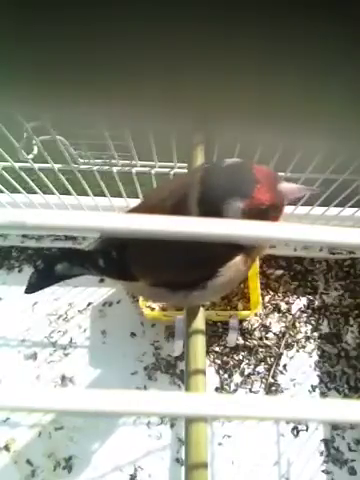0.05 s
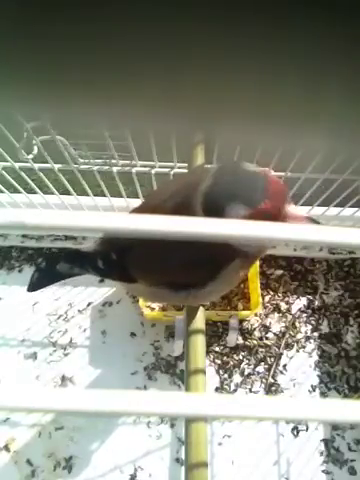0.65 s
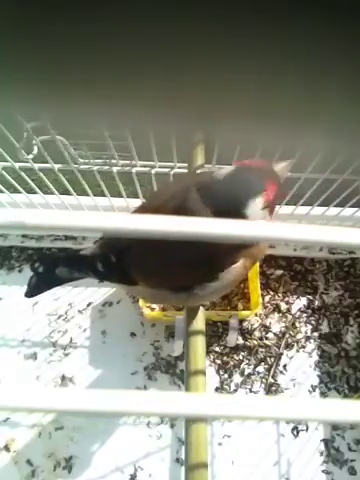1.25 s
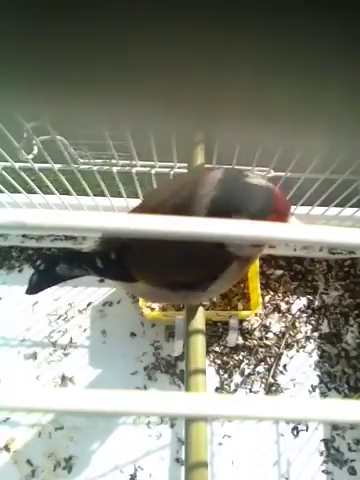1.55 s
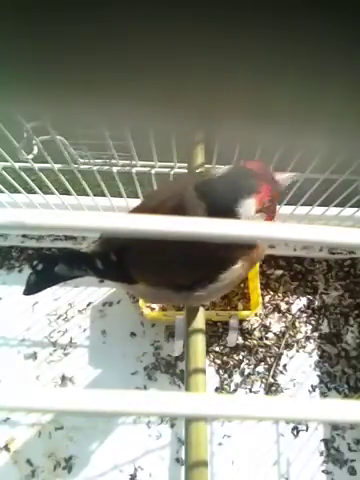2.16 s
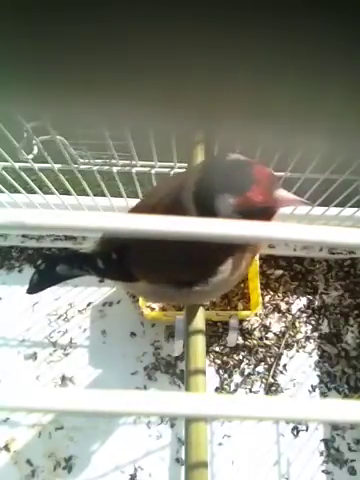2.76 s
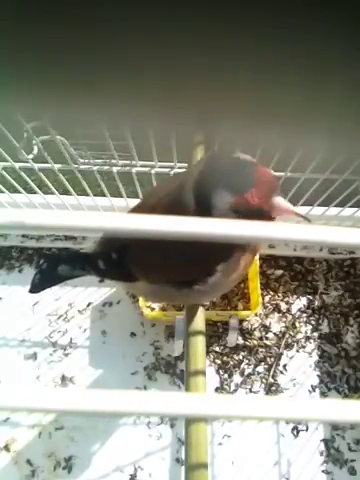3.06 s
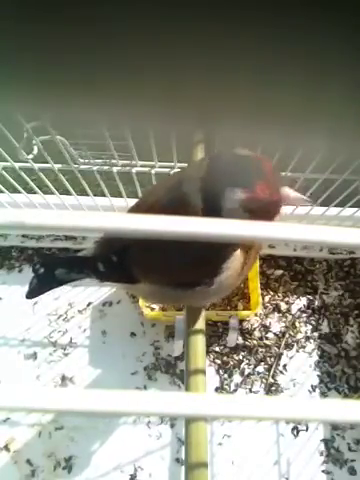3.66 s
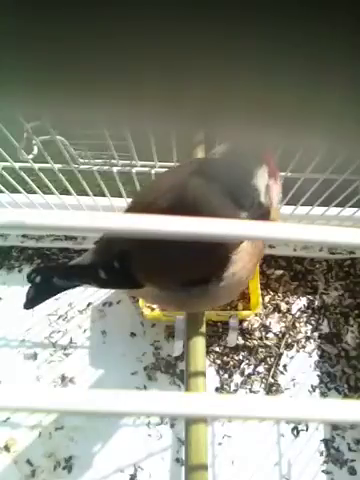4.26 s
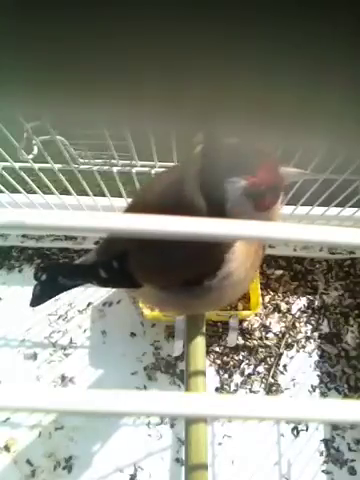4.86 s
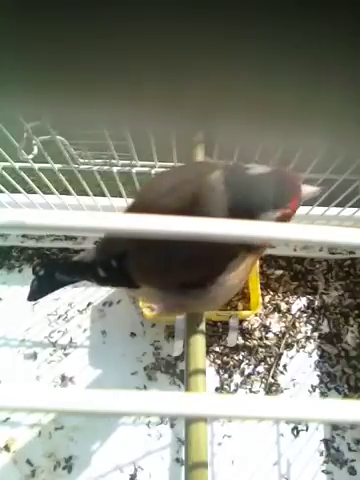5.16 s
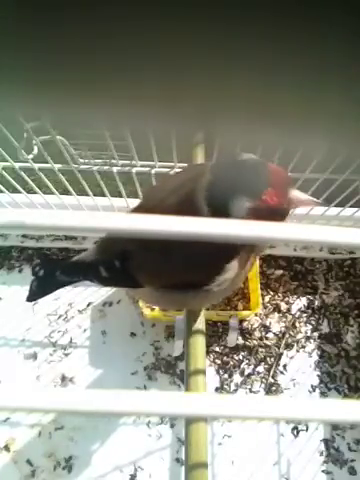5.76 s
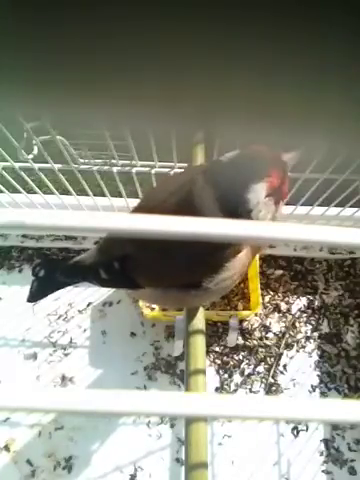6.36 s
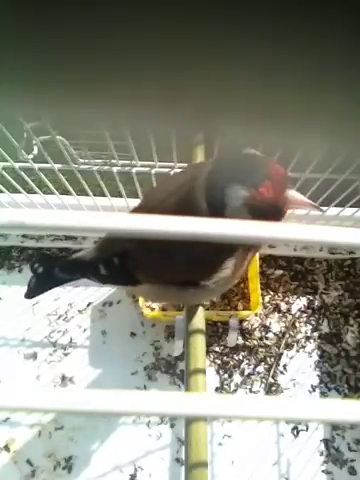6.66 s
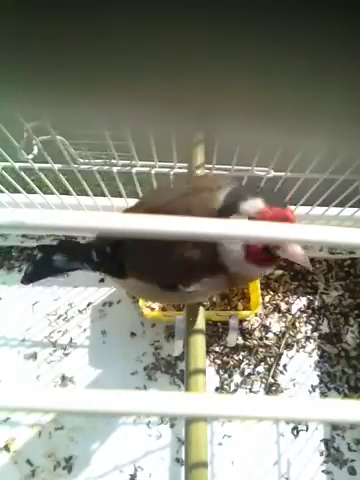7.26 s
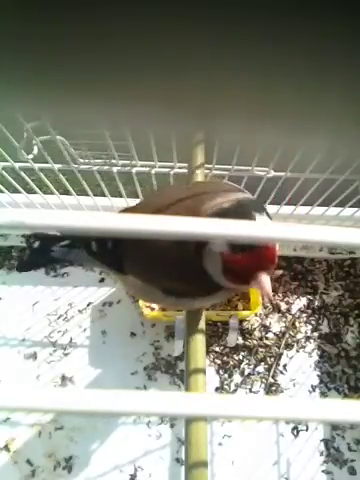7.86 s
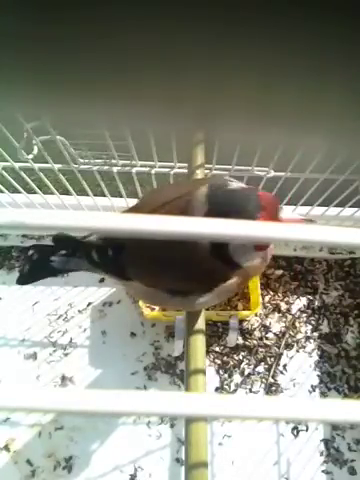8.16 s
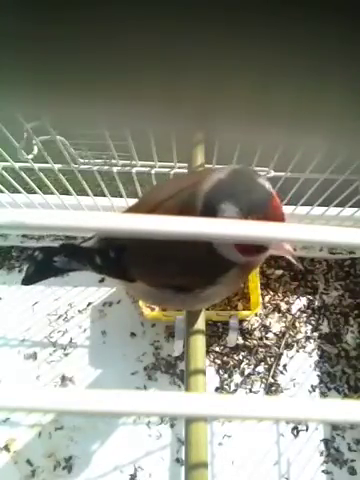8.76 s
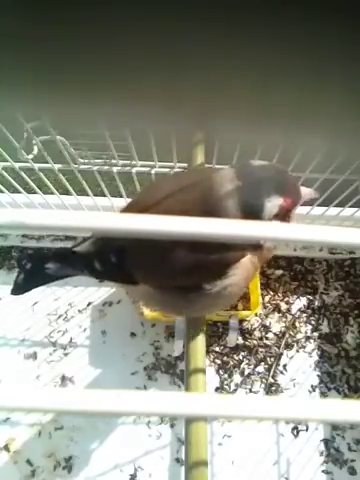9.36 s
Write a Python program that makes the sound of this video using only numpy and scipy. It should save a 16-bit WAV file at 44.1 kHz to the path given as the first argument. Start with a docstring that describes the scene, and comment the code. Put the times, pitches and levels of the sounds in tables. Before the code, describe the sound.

In a softly humming room, a small caged bird chirps right by the microphone. A brief flurry of high gliding notes gives way to a lull and single chips. The song then builds into a busy run of twitters, a thin whistle, a buzz and a fast trill, and thins out to isolated chirps. Dull little thuds and shuffles come from the cage, and another bird calls twice, far off.

```python
"""A goldfinch twitters, close by, in a wire cage indoors. The two sides of its voice box (the syrinx)
whistle quick glides, alone or together, with long whistles, a buzz and a trill among them.
The cage knocks and rumbles softly as the bird shifts on its perch.
A far bird answers faintly over the hum of the room."""
import sys
import numpy as np
from scipy import signal
from scipy.fft import rfft, irfft
from scipy.io import wavfile
from scipy.ndimage import uniform_filter1d

SR = 44100
rng = np.random.default_rng(int(sys.argv[2]) if len(sys.argv) > 2 else 0)


def inscribe(sig):
    """Save sig as 16-bit PCM at rate SR to the path in sys.argv[1].

    A 1-D sig is mono; a 2-D sig holds one channel per row.
    Samples are clipped to [-1, 1] before scaling.
    """
    pcm = np.round(np.clip(np.atleast_2d(sig).T, -1, 1) * 32767)
    wavfile.write(sys.argv[1], SR, pcm.astype(np.int16))


N = 419832  # about 9.5 seconds

# The notes of five syllables the bird knows. Overlapping notes sound together;
# the squawk opens with a low rising note under its louder overtone.
# Each row: delay in seconds, length in seconds, first pitch in Hz, last pitch in Hz, bend,
# level in dB within the syllable, crest, sharpness. See note() for bend, crest and sharpness.
DOUBLE_CHIRP = [(0, .03, 2357, 3962, 1.2, 1.5, 0.7, 1.6), (.022, .037, 2425, 4350, 0.93, -1.5, .43, 1.7)]
UPSLUR = [(0, .017, 4373, 5150, 0.14, -7, .6, 1.2), (.017, .039, 3600, 6050, 7, -0.5, 0.24, 1.5)]
CASCADE = [(0, 0.015, 9330, 6200, 2.5, -3.5, 0.33, 2), (.009, 0.055, 7300, 5297, 2.9, 0.5, 0.72, 3.53),
           (.058, .023, 3160, 4150, -0.83, -1, .58, 1.8), (.078, .028, 6000, 2750, 3, -8.5, .42, 1.3)]
TICK_DROP = [(0, 0.013, 3120, 7090, 1.2, -4, 0.25, 1.85), (.013, .024, 3900, 2720, 0.88, 0, 0.388, 1.3)]
SQUAWK = [(0, .038, 4320, 7180, .4, -12.5, .6, 1.9), (.005, .022, 2250, 3400, .4, -16.5, .8, 1.3),
          (.026, .033, 3300, 6750, 4.5, -1, 0.33, 1.7), (.032, .025, 3180, 4300, .9, -17, .4, 1.5)]
# When each syllable is sung.
# Each row: start in seconds, pitch multiplier, length multiplier, dB added to its notes.
DOUBLE_CHIRP_TIMES = [(.194, 1.05, 1.01, -14.5), (.347, 0.99, 0.99, -13), (.513, 0.98, 1.01, -11.5),
                      (.701, 1.01, 0.99, -10), (4.258, 1.11, 0.93, -14.5), (4.408, 1.02, 1.01, -9.5),
                      (4.573, 1, 1.035, -10), (6.587, 0.95, 0.97, -12.5)]
UPSLUR_TIMES = [(.279, 1.01, 0.96, -3), (.435, .99, 0.98, -4), (0.618, 1.01, 1.03, -3.5),
                (4.338, 1.01, .97, -0.6), (4.502, 0.98, 0.95, -3.5)]
CASCADE_TIMES = [(5.095, 1.045, 1.118, -5.5), (5.241, 1, 1.026, -6), (5.392, 1.01, .99, -3.5)]
TICK_DROP_TIMES = [(5.524, 0.97, 1.13, -16), (5.58, 1.01, 1.05, -11), (5.634, .99, .99, -11),
                   (5.689, .98, .99, -11.5)]
SQUAWK_TIMES = [(6.414, 1.01, 1, -2)]


def twitter(hiss_db=-40, hiss_hz=7000, hiss_width_hz=2600, low_notes_hz=4400):
    """Learned syllables come back higher or lower, slower or faster; air hisses in the low notes."""
    out = np.zeros(N)
    song = [(DOUBLE_CHIRP, DOUBLE_CHIRP_TIMES), (UPSLUR, UPSLUR_TIMES), (CASCADE, CASCADE_TIMES),
            (TICK_DROP, TICK_DROP_TIMES), (SQUAWK, SQUAWK_TIMES)]
    for syllable, repeats in song:
        for start, pitch, stretch, added_db in repeats:
            for delay, length, from_hz, to_hz, bend, db, crest, sharpness in syllable:
                sound = note(stretch * length, pitch * from_hz, pitch * to_hz, added_db + db,
                             bend, crest, sharpness)
                add(out, start + stretch * delay, sound)
    low_notes = signal.sosfilt(signal.butter(6, low_notes_hz, fs=SR, output="sos"), out)
    low_loudness = uniform_filter1d(np.abs(low_notes), SR // 100)
    air = noise(N, lambda f: np.exp(-((f - hiss_hz) / hiss_width_hz) ** 2))
    return out + undb(hiss_db) * air * low_loudness


# Lone rising chips, soft and low or quick and steep.
# Each row: start in seconds, length in seconds, first pitch in Hz, last pitch in Hz, level in dB.
CHIPS = [(2.372, .016, 2216, 2955, -20.5), (2.449, .029, 2774, 3275, -18.5), (2.577, .02, 3230, 3790, -11),
         (2.651, .023, 2337, 3020, -22.5), (3.346, .021, 2680, 3730, -15.5),
         (3.888, .017, 2352, 2780, -21.5), (3.957, 0.03, 2900, 3255, -15), (5.039, .021, 2770, 4550, -9.5),
         (8.316, 0.015, 2233, 2780, -26), (8.424, .023, 2640, 3330, -22), (8.571, .02, 2980, 3930, -14),
         (8.639, 0.021, 2293, 2980, -21.5), (9.248, 0.016, 2304, 2830, -20.5),
         (9.344, 0.018, 3110, 5020, -10), (9.445, .037, 2630, 4400, -9)]


def chips(click_db=-29, click_delay_s=.004, click_s=.004):
    """Each chip begins with a tiny click as the valve in the syrinx snaps open."""
    out, n = np.zeros(N), int(click_s * SR)
    for start, length, from_hz, to_hz, db in CHIPS:
        add(out, start, note(length, from_hz, to_hz, db, bend=.6, crest=.48, sharpness=1.5))
        click = noise(n, lambda f: np.exp(-np.log2(f / to_hz / 1.5) ** 2)) * np.hanning(n)
        add(out, start + click_delay_s, undb(db + click_db) * click)
    return out


# Steep upward flicks.
# Each row: start in seconds, length in seconds, first pitch in Hz, last pitch in Hz, level in dB.
FLICKS = [(.808, .012, 3800, 8700, -17), (3.039, 0.02, 3666, 6500, -10.5), (4.673, 0.015, 4050, 8700, -16),
          (5.957, .012, 5250, 8800, -8.5)]


def flicks():
    """The pitch shoots up in one tiny push of air, announcing a longer note."""
    out = np.zeros(N)
    for start, length, from_hz, to_hz, db in FLICKS:
        add(out, start, note(length, from_hz, to_hz, db, bend=-.2, crest=.4, sharpness=1.7))
    return out


# Two-voiced calls. Each row: start in seconds, length in seconds, bend, then the low voice's
# first pitch in Hz, last pitch in Hz and level in dB, then the same three for the high voice.
CHORDS = [(0.047, .037, 1.6, 4000, 5500, -13.5, 5950, 6910, -4),
          (2.713, 0.044, 1.7, 5610, 5520, -9.5, 6200, 7413, -4.5),
          (3.049, 0.036, 6, 4870, 5504, -4.5, 5300, 7250, -11),
          (4.11, 0.036, 1.6, 4530, 5650, -9.5, 5930, 6950, -4.5),
          (4.983, .041, .9, 3450, 5800, -9, 4750, 7320, -6.5),
          (6.488, .053, .3, 5850, 4750, -17.5, 8400, 6550, -8.5),
          (8.741, 0.036, 2.3, 4000, 5600, -9, 5900, 6900, -3.5)]


def chords():
    """Both sides of the syrinx sing at once, each on its own glide."""
    out = np.zeros(N)
    for start, length, bend, *voices in CHORDS:
        for from_hz, to_hz, db in np.reshape(voices, (2, -1)):
            add(out, start, note(length, from_hz, to_hz, db, bend, crest=.52, sharpness=1.9))
    return out


# Held whistles.
# Each row: start in seconds, length in seconds, first pitch in Hz, swell time in seconds, level in dB.
WHISTLES = [(0.823, 0.15, 5034, .066, -3), (4.698, .16, 5185, 0.046, -0.2)]


def whistles(sag_db_per_s=-72.5, release_s=.007, pitch_waver=.001, waver_db=1.2):
    """Long notes swell, settle on one pitch, sag as the air runs out and stop short."""
    out = np.zeros(N)
    for start, length, from_hz, swell_s, db in WHISTLES:
        t = np.arange(int(length * SR)) / SR
        hz = settle(t, from_hz, rest_hz=4518, settle_s=.031, ease=1.4)
        hz *= 1 + pitch_waver * wander(len(t), 70)
        swell = np.sin(np.pi / 2 * np.minimum(t / swell_s, 1)) ** 2
        sag = undb(db + sag_db_per_s * np.maximum(t - swell_s, 0) + waver_db * wander(len(t), 50))
        release = np.minimum((length - t) / release_s, 1)
        loud = swell * sag * release
        add(out, start, syrinx(hz, loud, jitter=.0005, shimmer_db=.5, flutter=0, second_db=-39.5))
    return out


# How the bird's effort and the beat of its valve change through the buzz and the trill. Each row: time
# in seconds, level in dB before the boost, beats per second, pitch flick as a share of the pitch.
BUZZ = [(5.978, -27.5, 250, .01), (5.998, -7, 248, 0.064), (6.035, -9.5, 165, 0.076),
        (6.065, -16.5, 108, 0.024), (6.115, -16.5, 94, 0.025), (6.212, -20.5, 127, 0.013),
        (6.228, -22.5, 131, 0.1), (6.305, -23.5, 155.5, 0.12)]
TRILL = [(6.718, -35.5, 79, .08), (6.735, -10, 79, .12), (6.76, -9.5, 78, .09), (6.795, -3.5, 78, .07),
         (6.87, -1.5, 79, .04), (6.915, -5.5, 89, .07), (6.972, -10.5, 95, .045), (6.986, -30, 95, .04)]


def buzz():
    """The valve closes in quick, narrow beats, turning a falling note into a buzz."""
    fall = dict(from_hz=5100, rest_hz=2830, settle_s=.062, ease=.88)
    return valve_beats(BUZZ, fall, onset_s=.014, depth=.66, narrowness=6, boost_db=1.5, second_db=-25.5)


def trill():
    """Slower, deeper beats of the valve chop a higher falling note into a trill."""
    fall = dict(from_hz=8310, rest_hz=4106, settle_s=.15, ease=.93)
    return valve_beats(TRILL, fall, onset_s=.0098, depth=.83, narrowness=1.8, boost_db=3, second_db=-36)


def valve_beats(curve, fall, onset_s, depth, narrowness, boost_db, second_db):
    """Each time the valve closes on a falling note, the sound dips and the pitch flicks up."""
    times, db, beat_hz, flick = np.transpose(curve)
    t, loud = loudness_curve(times, db)
    age = t - t[0]
    # no two beats are quite alike in length, pitch flick or strength
    rate = np.interp(t, times, beat_hz) * (1 + .04 * wander(len(t), 80))
    flick = np.interp(t, times, flick) * undb(3 * wander(len(t), 90))
    loud *= undb(boost_db + .7 * wander(len(t), 80))
    beat_count = np.cumsum(rate * (age > onset_s)) / SR
    closed = np.abs(np.cos(np.pi * beat_count)) ** narrowness  # 0 is open, 1 is closed
    closed *= np.clip(age / onset_s, 0, 1) ** 10  # the note begins with the valve open
    hz = settle(age, **fall) * (1 + flick * (closed - closed.mean()))
    loud *= 1 - depth * closed
    out = np.zeros(N)
    add(out, t[0], syrinx(hz, loud, jitter=0, shimmer_db=2, flutter=.003, second_db=second_db))
    return out


# The path of one low whine. Each row: time in seconds, pitch in Hz, level in dB.
WHINE = [(3.495, 1960, -33), (3.519, 2027, -30), (3.565, 2218, -25.5), (3.585, 2530, -20),
         (3.615, 2673, -20), (3.642, 2970, -34.5)]


def whine():
    """A rising note, so low that its overtones stand out and it sounds nasal."""
    out = np.zeros(N)
    start, hz, loud = held_note(WHINE)
    tone = syrinx(hz, loud, jitter=.0038, shimmer_db=1.2, flutter=.014, third_db=-38.5, fourth_db=-49)
    add(out, start, tone)
    return out


# Hoarse starts to notes.
# Each row: start in seconds, length in seconds, centre pitch in Hz, band width in Hz, level in dB.
RASPS = [(3.457, .04, 3800, 2200, -39), (6.416, .055, 4250, 2900, -24)]


def rasps():
    """The syrinx rattles for a moment as a note gets going."""
    return noise_bursts(RASPS)


def note(length, from_hz, to_hz, db, bend, crest, sharpness):
    """One push of air swells and fades while the pitch glides."""
    progress = np.linspace(0, 1, int(length * SR))
    # with bend above 0 the glide starts fast and levels off; below 0 it speeds up
    hz = from_hz + (to_hz - from_hz) * np.expm1(-bend * progress) / np.expm1(-bend)
    # crest is the loudest point (0 start, 1 end); more sharpness makes that peak narrower
    push = np.interp(progress, [0, crest, 1], [0, 1, 0])
    loud = undb(db) * np.sin(np.pi / 2 * push) ** sharpness
    hoarseness = .017 * np.minimum(3280 / hz, 1) ** 2.2  # notes get purer above 3280 Hz
    return syrinx(hz, loud, flutter=hoarseness)


def syrinx(hz, loud, jitter=.0044, shimmer_db=2.36, flutter=.0078,
           second_db=-34, third_db=-36, fourth_db=-48):
    """The voice box makes a nearly pure whistle; jitter shakes its pitch and shimmer its level."""
    throat_hz = 3150
    windpipe_hz, windpipe_width_hz, windpipe_db = 9200, 1100, 6.5
    n = len(hz)
    hz = hz * (1 + jitter * wander(n, 900))
    # swirling air shakes the phase (flutter, in radians), blurring the overtones most
    phase = 2 * np.pi * np.cumsum(hz) / SR + flutter * wander(n, 5000)
    # overtones stand out in notes below the pitch at which the throat rings
    octaves_below = np.maximum(np.log2(throat_hz / hz), 0)
    tone = np.sin(phase)
    for k, db, db_per_octave in [(2, second_db, 42), (3, third_db, 27), (4, fourth_db, 27)]:
        # the windpipe rings too, lifting any overtone that passes through its pitch
        lift_db = windpipe_db * np.exp(-((k * hz - windpipe_hz) / windpipe_width_hz) ** 2)
        gain = undb(db + db_per_octave * octaves_below + lift_db + 2 * wander(n, 250))
        tone += gain * np.sin(k * phase) * (k * hz < SR / 2)
    return tone * loud * undb(shimmer_db * wander(n, 500))


def settle(t, from_hz, rest_hz, settle_s, ease):
    """The pitch sinks as the syrinx relaxes; with ease above 1 it lingers first."""
    return rest_hz + (from_hz - rest_hz) * np.exp(-(t / settle_s) ** ease)


# Knocks on the cage floor. Each row: start in seconds, level in dB, pitch of the thud in Hz.
KNOCKS = [(.361, -14, 268), (0.397, -27.5, 200), (0.853, -28, 150), (1.142, -31, 150.2), (1.445, -27, 160),
          (3.769, -25.5, 221.7), (3.789, -20, 170), (6.777, -16, 219.4), (7.452, -32.5, 160),
          (8.39, -26.5, 150)]


def knocks(push_s=.0027, tray_hz=172, ring_s=.03, ring_db=-20):
    """Each soft blow gives a short thud, and the plastic tray rings briefly."""
    out, t = np.zeros(N), np.arange(SR // 2) / SR
    for start, db, hz in KNOCKS:
        push = (t / push_s) ** 2 * np.exp(2 - 2 * t / push_s)
        thud = push * np.sin(2 * np.pi * hz * t)
        tray = undb(ring_db) * np.exp(-t / ring_s) * np.sin(2 * np.pi * tray_hz * t)
        add(out, start, undb(db) * (thud + tray))
    return out


# The bird's shuffles. Each row: start in seconds, length in seconds, level in dB.
SHUFFLES = [(.31, .14, -37), (1.3, .29, -48.5), (2.849, .16, -46), (3.235, .17, -42.5), (3.618, .2, -39.5),
            (5.696, .2, -42), (6.33, .17, -40)]


def shuffles(rumble_hz=156, width_hz=67):
    """The cage rumbles as the bird shuffles about."""
    return noise_bursts([(start, length, rumble_hz, width_hz, db) for start, length, db in SHUFFLES])


# A claw on the perch.
# Each row: start in seconds, length in seconds, centre pitch in Hz, band width in Hz, level in dB.
SCRAPES = [(.744, 0.017, 1677, 2025, -39.5)]


def claw_scrape():
    """A claw drags on the perch with one short scratch."""
    return noise_bursts(SCRAPES)


# The far bird's thin rising call. Each row: time in seconds, pitch in Hz, level in dB.
FAR_CALL = [(1.65, 3100, -74), (1.82, 3405, -54), (1.89, 3340, -58)]
# Its blurred chirps.
# Each row: start in seconds, length in seconds, centre pitch in Hz, band width in Hz, level in dB.
FAR_CHIRPS = [(1.875, .08, 4600, 1500, -49.5), (5.77, 0.064, 4810, 610, -45.5)]


def far_bird():
    """Another bird gives two blurred chirps and a thin call with a strong overtone an octave up."""
    out = noise_bursts(FAR_CHIRPS)
    start, hz, loud = held_note(FAR_CALL)
    add(out, start, syrinx(hz, loud, jitter=.009, shimmer_db=3, second_db=2.5))
    return out


def room_echoes(sound, early_db=-23, early_s=.019, tail_db=-41, tail_s=.33, gap_s=.0011):
    """Sound bounces quickly off the cage and the wall behind it, then dies away in the room."""
    t = np.arange(SR // 2) / SR
    early = (sound * head_turn() * undb(early_db), np.exp(-t / early_s))
    tail = (sound * undb(tail_db), undb(-60 * t / tail_s))
    for sent, decay in (early, tail):
        echoes = rng.standard_normal(len(t)) * decay * (t > gap_s)
        sound = sound + signal.fftconvolve(sent, echoes / np.linalg.norm(echoes))[:N]
    return sound


def head_turn(start_s=4.95, end_s=5.78, bounce_db=3):
    """While the bird faces the cage wall, more of its song arrives as echoes."""
    t = np.arange(N) / SR
    facing_wall = 1. * ((t > start_s) & (t < end_s))
    return undb(bounce_db * uniform_filter1d(facing_wall, SR // 20))


# The room's background noise, from bass to treble. Each row: frequency in Hz, relative level in dB.
ROOM_SPECTRUM = [(18, -66.5), (30, -41), (92, -6), (255, -3.5), (399, -9.5), (441, -11.5), (908, -14),
                 (1190, -16.5), (2170, -25.5), (6170, -26), (10200, -37.5), (11500, -62.5), (15000, -95),
                 (22000, -120)]


def room_tone(level_db=-48.5, waver_db=1.73, hum_below_hz=450):
    """A steady hiss lies above a low hum that wavers."""
    hz, db = np.transpose(ROOM_SPECTRUM)
    air = noise(N, lambda f: undb(np.interp(np.log(f), np.log(hz), db)))
    hum = signal.sosfilt(signal.butter(1, hum_below_hz, fs=SR, output="sos"), air)
    waver = undb(-waver_db * wander(N, 5.2)) - 1
    return undb(level_db) * (air + hum * waver)


def faint_hums(pitches_hz=(300, 370, 440), db=-66, swell_db=3, drift=.026):
    """Three weak, low tones drift in pitch and come and go."""
    phases = [2 * np.pi * np.cumsum(hz * (1 + drift * wander(N, 2.3))) / SR for hz in pitches_hz]
    return sum(undb(db + swell_db * wander(N, 1.6)) * np.sin(phase) for phase in phases)


# Faint tones from far off. Each row: start in seconds, length in seconds, pitch in Hz, level in dB.
FAR_TONES = [(2.85, .65, 765, -61), (2.88, .55, 370, -54), (7.2, .28, 312, -54), (7.41, .33, 440, -56)]


def far_tones(drift=.0076):
    """Barely heard tones swell and fade in the background."""
    out = np.zeros(N)
    for start, length, hz, db in FAR_TONES:
        n = int(length * SR)
        phase = 2 * np.pi * np.cumsum(hz * (1 + drift * wander(n, 20))) / SR
        add(out, start, undb(db) * np.sin(phase) * np.sin(np.linspace(0, np.pi, n)))
    return out


def noise_bursts(table):
    """Short swells of noise, each gathered around one pitch."""
    out = np.zeros(N)
    for start, length, hz, width_hz, db in table:
        n = int(length * SR)
        band = noise(n, lambda f: 1 / (1 + ((f / hz - hz / f) * hz / width_hz / 2) ** 2) ** 2)
        add(out, start, undb(db) * band * np.sin(np.linspace(0, np.pi, n)))
    return out


def held_note(curve):
    """The start time of a held note, then its pitch and loudness at every sample."""
    times, hz, db = np.transpose(curve)
    t, loud = loudness_curve(times, db)
    return t[0], np.interp(t, times, hz), loud


def loudness_curve(times, db, fade_s=.004):
    """Join levels into a line that fades at both ends; gives time and loudness at every sample."""
    t = np.arange(times[0] - fade_s, times[-1] + fade_s, 1 / SR)
    fades = np.clip(np.minimum(t - t[0], t[-1] - t) / fade_s, 0, 1)
    return t, fades * np.interp(t, times, undb(db))


def wander(n, rate):
    """A smooth random wobble, about 1 in size, that changes about rate times a second."""
    hold = int(SR / rate)
    steps = np.repeat(rng.standard_normal(n // hold + 1), hold)
    return 1.3 * uniform_filter1d(uniform_filter1d(steps, hold), hold)[:n]


def noise(n, gain):
    """Noise of typical size 1; gain(Hz) sets the balance of low and high frequencies."""
    hz = np.fft.rfftfreq(n, 1 / SR) + 1
    shaped = irfft(rfft(rng.standard_normal(n)) * gain(hz), n)
    return shaped / shaped.std()


def undb(db):
    """Turn decibels into a multiplier."""
    return 10 ** (np.asarray(db) / 20)


def add(track, start_s, sound):
    """Mix a sound into the track at its start time."""
    i = int(start_s * SR)
    track[i:i + len(sound)] += sound[:N - i]


def scene():
    """The song, the cage and the far bird echo in one softly humming room."""
    song = buzz() + trill() + twitter() + chips() + flicks() + chords() + whistles() + whine() + rasps()
    cage = knocks() + shuffles() + claw_scrape()
    return (room_echoes(song + cage + far_bird()) + room_tone() + faint_hums() + far_tones())[None]


def record(dry, ceiling=.96, lopsidedness=.012, low_cut_hz=70, dull_hz=10700, top_hz=10900):
    """A fast limiter holds down the peaks; deep bass and the highest treble are cut."""
    loudness = np.abs(signal.hilbert(dry))
    # the limiter and a slightly lopsided microphone add faint extra tones to two-voiced notes
    limited = dry / (1 + (loudness / ceiling) ** 10) ** (1 / 10)
    bent = limited + lopsidedness * limited ** 2
    thinned = signal.sosfilt(signal.butter(2, low_cut_hz, "high", fs=SR, output="sos"), bent)
    dulled = signal.sosfilt(signal.butter(10, dull_hz, fs=SR, output="sos"), thinned)
    return signal.sosfiltfilt(signal.ellip(7, .1, 50, top_hz, fs=SR, output="sos"), dulled)


dry = scene()
out = record(dry)
inscribe(out)
```